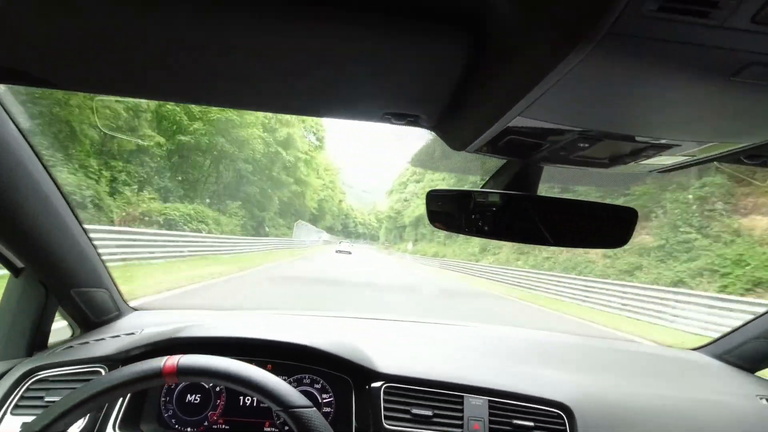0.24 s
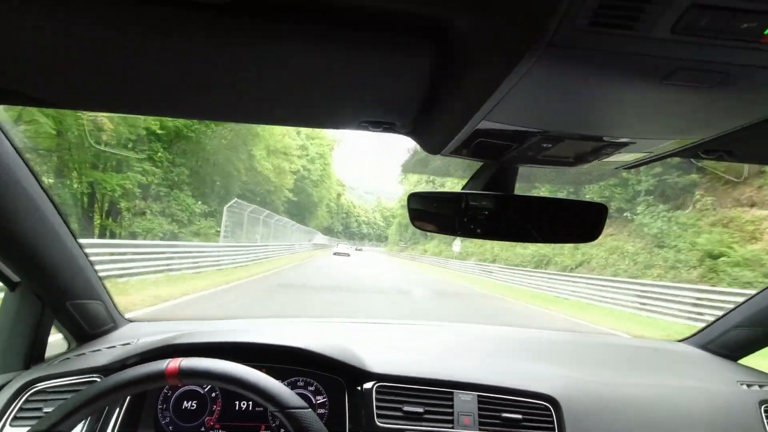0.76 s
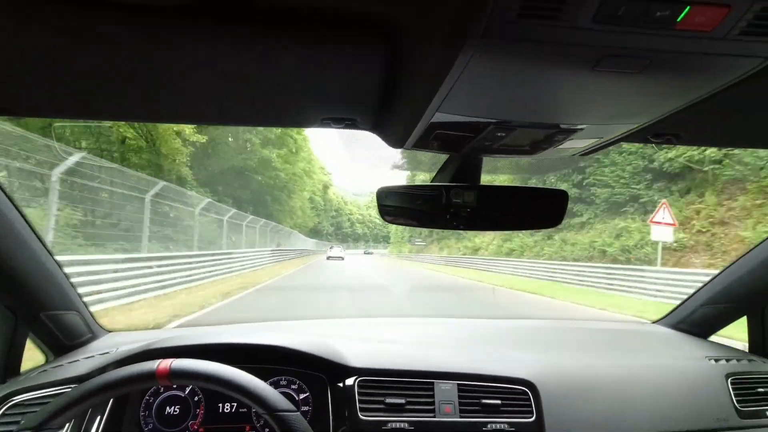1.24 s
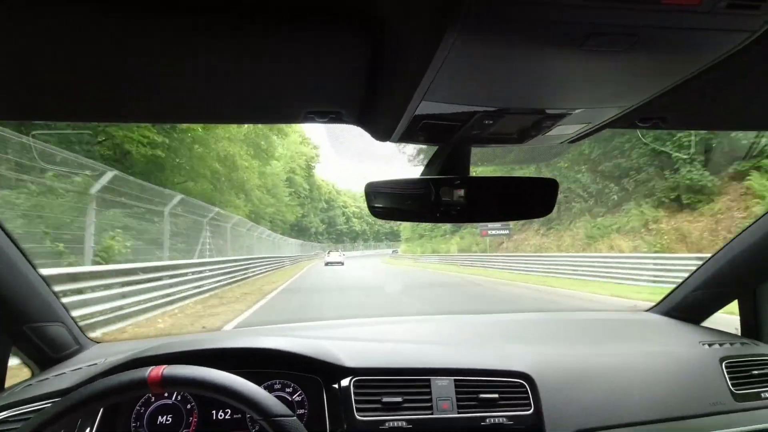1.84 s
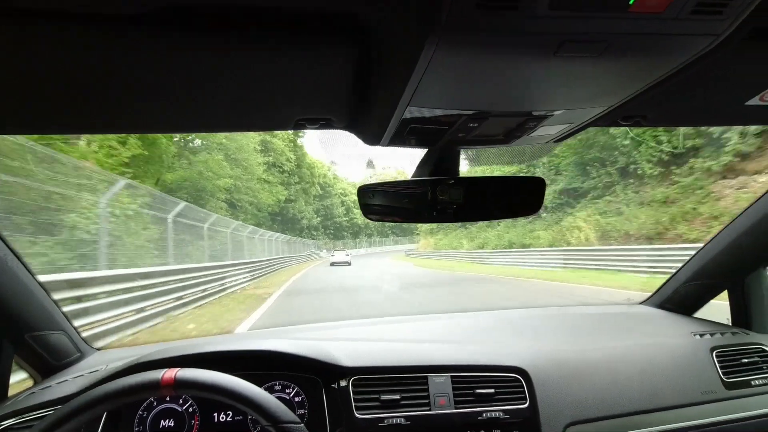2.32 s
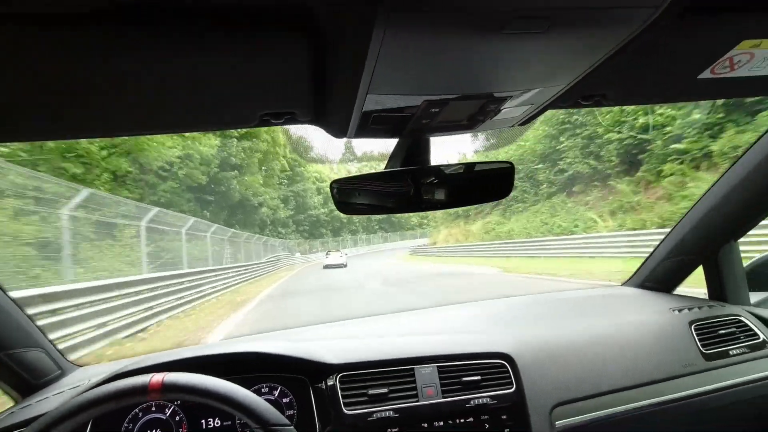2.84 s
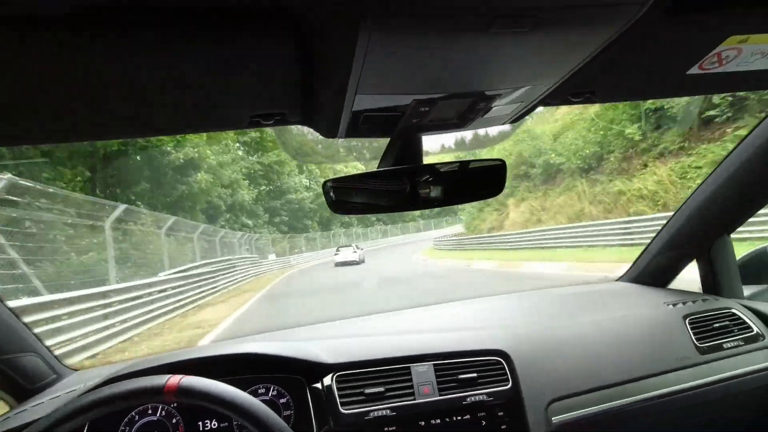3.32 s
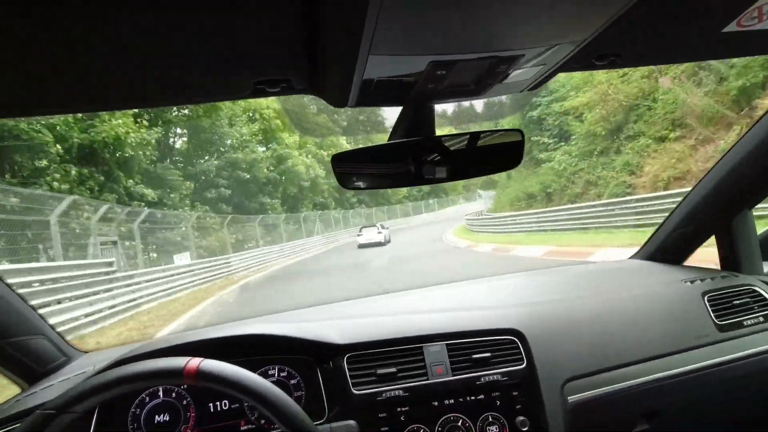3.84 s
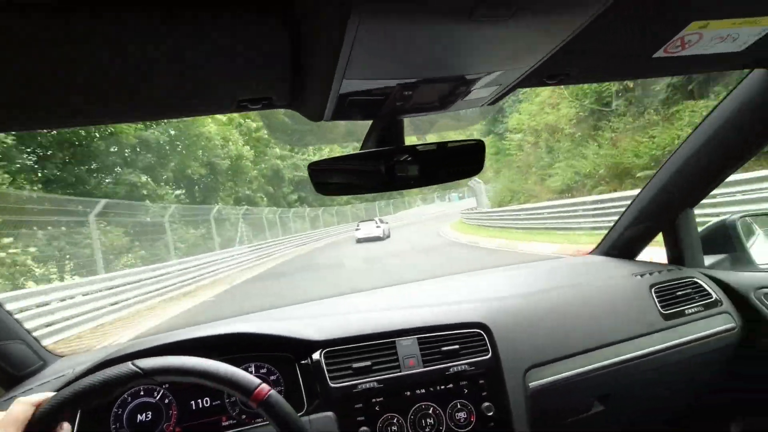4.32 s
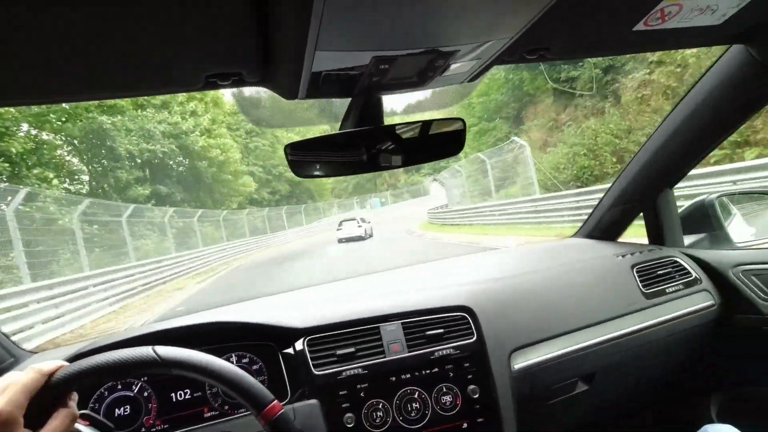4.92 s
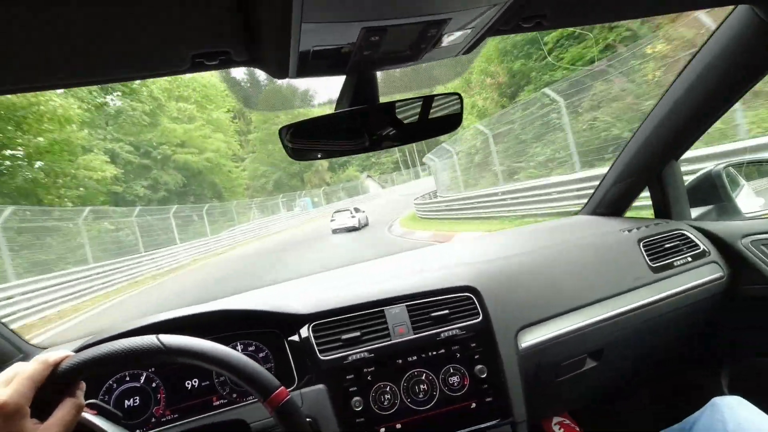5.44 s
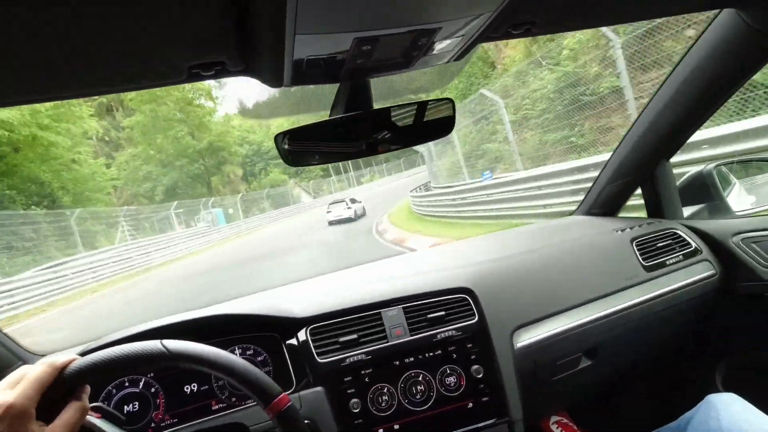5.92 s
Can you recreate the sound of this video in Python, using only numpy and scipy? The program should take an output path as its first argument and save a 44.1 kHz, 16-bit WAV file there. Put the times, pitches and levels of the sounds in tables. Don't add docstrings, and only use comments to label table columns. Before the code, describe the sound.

A stereo microphone in a car cabin picks up heavy low rumble and boom, road roar and soft wind hiss over a muffled engine. Speed drops steadily; the engine note sinks, then jumps up at each of two downshifts, with a bright plastic knock between them. Tyres then begin a rough mid-pitched howl with wavering squeals, a kerb hit makes loose parts clatter toward the right, and the engine pulls gently again.

```python
import sys
import numpy as np
from scipy import signal
from scipy.fft import rfft, irfft, next_fast_len
from scipy.io import wavfile
from scipy.ndimage import uniform_filter1d, map_coordinates

SR = 44100
rng = np.random.default_rng(int(sys.argv[2]) if len(sys.argv) > 2 else 0)


def boost_factor(decibels):
    exponent = np.asarray(decibels, float) / 20
    return 10 ** exponent


def digitize_waveform(pressure):
    field = np.atleast_2d(pressure).T
    bounded = np.clip(field, -1, 1)
    quanta = np.round(bounded * 32767).astype(np.int16)
    wavfile.write(sys.argv[1], SR, quanta)


N = 272097

# time in seconds, wheel turns per second, throttle from 0 to 1, road coarseness in dB.
DRIVE = [(0, 26.4, 1, 2.5), (.3, 26.7, 1, -0.5), (.45, 27.2, 0.8, 2.5), (.56, 26.8, 0.3, -0.5),
         (.98, 25.51, 0.05, 1.5), (1.2, 25.2, 0, -1), (1.55, 23.6, 0.32, 0), (1.9, 21.63, 0.2, 0.5),
         (2.22, 20.2, 0, 2), (2.4, 19.3, 0.04, -1), (2.9, 17.8, 0.17, 0), (3.55, 16.2, 0, 0.5),
         (3.95, 14.93, 0.04, 0.5), (4.4, 14.3, 0.01, -2), (4.9, 13.9, 0.15, 2), (5.35, 13.52, 0.32, 2.5),
         (5.78, 13.9, 0.32, -0.5), (6.0, 13.6, .42, 0.5)]
# time in seconds, crank turns per wheel turn.
GEARS = [
    (2.22, 3.42),
    (2.4, 4.7),
    (3.3, 4.7),
    (3.55, 6.23),
]
CRUISE_HZ = 20

# frequency in Hz, level in dB per Hz.
HEAVE_COLOUR = [(8.8, -29), (15, -2.5), (32, 2), (59, -6), (75, -9), (98, -25), (160, -120)]
RUMBLE_COLOUR = [(35, -41), (60, -9), (91, -3.5), (145, -1.5), (178, -6.5), (202, -6), (225, -11),
                 (252, -9.5), (278, -18), (344, -15.5), (450, -18), (580, -49), (990, -120)]
ROAR_COLOUR = [(180, -32.5), (300, -6), (349, -3.5), (392, -7.5), (487, -7.5), (565, -13), (714, -16.5),
               (830, -10), (887, -12.5), (1120, -14), (1220, -18.5), (1500, -19.5), (2200, -37),
               (2860, -66), (4840, -120)]
RUSH_COLOUR = [(1100, -40), (1800, -0.5), (2500, -3), (3100, -8), (3700, -11), (4350, -17.5), (5100, -20.5),
               (5900, -27), (6700, -33.5), (8900, -30), (10200, -35.5), (11700, -40), (12800, -39),
               (13000, -51.5), (16000, -59.5)]
# level in dB, dB per doubling of speed, dB at full throttle,
# share of the road coarseness, share of a jolt.
HEAVE_LAW = (-38.5, 2, -1.5, .5, 1)
RUMBLE_LAW = (-35.5, 3.5, -1, 0.93, 0.11)
ROAR_LAW = (-46, 2.5, 3.5, 0.47, 0.04)
RUSH_LAW = (-64.5, 4.5, 2.5, .5, 0.1027)
BOOM_LAW = (-42, 2, -0.5, -0.5, 0)
# start in seconds, length in seconds, body heave in dB, cabin boom in dB, boom pitch in Hz.
BUMPS = [(-.1, .17, -27, -31.5, 120.8), (0.098, .16, -29.5, -27, 101.2), (0.359, 0.07, -29.5, -29.5, 98.4),
         (0.628, 0.044, -33.5, -37.5, 102.2), (0.74, 0.044, -31, -32, 104.7),
         (.875, .08, -28.5, -18, 102.5), (.955, 0.064, -24.5, -18.5, 101.4), (1.36, 0.14, -44.5, -38, 90.9),
         (1.753, .08, -41.5, -38, 101), (1.921, .22, -40, -37.5, 117), (2.408, 0.091, -31.5, -36, 89.2),
         (2.501, .16, -30, -29.5, 97.9), (2.7, .08, -30.5, -42, 111.3), (2.87, .06, -36, -38.5, 109.3),
         (3.068, 0.044, -39.5, -38, 107.4), (3.27, .18, -37, -39, 88.3), (3.508, 0.064, -38.5, -43, 91.8),
         (3.621, .2, -39, -40, 98.6), (3.855, 0.078, -38.5, -39, 93.5), (5.119, 0.17, -35.5, -41, 100.4),
         (5.444, .03, -41.5, -51, 100), (5.705, 0.091, -40, -42.5, 101.2), (6.002, 0.091, -45, -42, 87)]
BUMP_RISE_S, BUMP_T60_S = .018, .2
BOOM_HZ, BOOM_DRIFT_HZ = 100, 6
# start in seconds, pitch in Hz, level in dB, time to fade 60 dB in seconds.
THUDS = [
    (.886, 81, -12.5, .12),
    (.36, 64, -19.5, .15),
    (5.45, 33, -19, 0.22),
    (5.439, 168, -24, 0.36),
    (5.439, 184, -24, 0.36),
    (5.449, 350, -25.5, 0.17),
    (5.449, 370, -26, .17),
    (-.024, 27, -18, .2),
    (5.445, 700, -37, 0.14),
    (5.44, 970, -42, .1),
]

# start in seconds, dull chatter in dB, bright tick in dB, shake length in seconds.
RATTLES = [(.04, -77, -91, .05), (0.466, -77, -74, 0.023), (0.548, -86, -86.5, .02),
           (0.869, -77.5, -84, .02), (1.004, -71.5, -86.5, .02), (1.5, -77, -87.5, 0.023),
           (2.422, -70, -76, .025), (2.732, -81, -84.5, .02), (2.791, -82, -79, .01),
           (2.824, -69, -77.5, 0.027), (2.927, -56.5, -75.5, .02), (3.01, -77.5, -86, .02),
           (3.258, -69, -89, .02), (3.332, -67.5, -85, 0.027), (3.636, -61.5, -82, 0.025),
           (3.986, -77, -84, 0.022), (4.267, -83, -83, .03), (4.568, -84.5, -86, .02),
           (4.776, -85, -80, .02), (4.848, -64.5, -81.5, .022), (4.886, -73, -81, 0.022),
           (5, -71, -79.5, 0.027), (5.115, -78, -82, 0.012), (5.132, -63, -81, 0.02),
           (5.222, -84, -90, .02), (5.349, -81.5, -79, .05), (5.431, -52, -63.5, 0.024),
           (5.867, -81, -87, .03)]
# frequency in Hz, level in dB per Hz.
DULL_COLOUR = [(500, -120), (1200, -2), (3000, 3.5), (4500, -2.5), (6000, -10.5), (7500, -21), (9000, -120)]
BRIGHT_COLOUR = [(5000, -120), (6500, -10), (8600, -6), (9500, -0.5), (10700, -3.5), (12400, -13),
                 (13400, -25), (14700, -10.5), (15600, -20), (16500, -120)]
FADE_S, FADE_S_PER_DB, SOFT_DB = .11, .0035, -78
BRIGHT_FADES = 1.5

# pitch in Hz, width in Hz, level in dB.
CLIP_MODES = [(2220, 40, -10), (3000, 30, -7), (3460, 60, -1), (3540, 35, -2), (3810, 30, 0),
              (3990, 25, -2), (4670, 45, -8), (5190, 28, -8), (5450, 30, -9), (5930, 60, -17),
              (6320, 60, -17), (7400, 150, -23), (8880, 150, -28)]
BUCKLE_MODES = [(1510, 150, 2), (1750, 90, 2), (2000, 60, -2), (2220, 45, -7), (2590, 40, -4),
                (2740, 35, -6), (3190, 40, -7), (4310, 80, -11), (5080, 45, -8), (9490, 120, -21),
                (10500, 110, -18), (11400, 100, -25), (12500, 45, -25), (14500, 200, -27)]
TRIM_MODES = [(5200, 200, -8), (9210, 120, 0), (10400, 60, -7), (11400, 120, -9), (12700, 60, -11),
              (14700, 150, -15)]
# time in seconds, level in dB.
CLIP_HITS = [
    (2.931, -47.5),
    (2.943, -47.5),
    (2.957, -50),
    (2.979, -56),
    (3.637, -72),
    (4.896, -71.5),
]
BUCKLE_HITS = [(4.852, -71), (4.9, -56), (5.015, -66), (5.136, -63), (5.428, -53.5), (5.4347, -43.5),
               (5.439, -43.5), (5.452, -46.5), (5.458, -47.5), (5.476, -47), (5.49, -55), (5.508, -58.5)]
TRIM_HITS = [(.47, -68.5), (1.0023, -79), (1.898, -78), (2.4216, -74.5), (2.4355, -69), (2.7967, -72.5),
             (2.8296, -71), (3.3395, -76), (3.6368, -69), (4.2639, -76), (4.7712, -76), (4.7792, -77),
             (4.8475, -73.5), (4.882, -71), (4.9907, -76), (5.0162, -71), (5.1159, -71), (5.1399, -68),
             (5.3509, -70), (5.4395, -58)]
CRACK_DB, CRACK_T60_S = -5, .012
DULLING = .4

# start in seconds, end in seconds,
# first pitch in Hz, last pitch in Hz, level in dB.
DRONES = [(-.05, .3, 351, 349, -41), (.36, .68, 357, 348, -40), (-.1, .45, 1806, 1803, -62),
          (.44, .62, 380, 376, -45), (0, .49, 1015, 1018, -56), (2.36, 2.65, 468, 458, -54),
          (2.08, 2.33, 202, 198, -42), (1.04, 1.36, 139, 142, -36.5), (3, 3.35, 137, 134, -39.5),
          (3.64, 3.95, 340, 345, -46), (3.22, 3.45, 203, 200, -44), (5.65, 5.85, 918, 927, -48.5),
          (5.67, 5.82, 880, 892, -52), (3.14, 3.32, 250, 246, -46), (4.62, 4.95, 186, 182, -44),
          (3.46, 3.62, 80, 110, -33), (3.54, 3.69, 128, 152, -38), (3.61, 3.74, 68, 86, -38),
          (4.05, 4.27, 152, 158, -43), (3.83, 3.99, 176, 165, -41), (1.62, 1.85, 158, 148, -40),
          (1.98, 2.14, 168, 163, -41), (4.7, 4.93, 192, 208, -45), (5.72, 6.3, 330, 345, -48.5),
          (5.82, 6.3, 594, 604, -57), (5.15, 5.34, 104, 112, -37), (4.18, 4.4, 320, 340, -50),
          (2.93, 3.1, 232, 240, -45)]
SQUEALS = [(.5, 2.1, 828, 828, -59), (-.1, .2, 1150, 1150, -53), (4.58, 4.92, 805, 842, -55),
           (5.02, 5.4, 812, 836, -51), (5.2, 5.32, 875, 880, -57), (5.05, 5.33, 760, 755, -59),
           (5.42, 5.72, 690, 700, -62), (5.36, 5.7, 865, 890, -55), (4.82, 4.95, 875, 890, -55),
           (5.6, 6.3, 660, 690, -61), (5.88, 6.4, 1015, 1075, -57), (.2, .48, 1230, 1230, -58),
           (5.42, 5.68, 960, 935, -57), (5.72, 5.9, 1035, 1050, -57), (5.84, 6.0, 1090, 1090, -58),
           (4.9, 5.06, 920, 940, -58)]
DRONE_BLUR_HZ, SQUEAL_BLUR_HZ = 1.5, 7
# time in seconds, level in dB.
HOWL_LEVEL = [(4.3, -75.5), (4.6, -57), (4.9, -52.5), (5.2, -54), (5.5, -49.5), (5.8, -50.5), (6.17, -51)]
# frequency in Hz, level in dB per Hz.
SLIP_COLOUR = [(600, -59.5), (720, -8.5), (830, 1), (950, 1.5), (1100, -5.5), (1300, -21.5), (1600, -61.5)]

# multiple of the crank speed, level off the throttle in dB, dB gained at full throttle.
ENGINE_ORDERS = [(4 / 2, -51.5, 6.4), (5 / 2, -70, 24), (6 / 2, -62, 9.3), (7 / 2, -65.5, 25),
                 (8 / 2, -70, 23), (10 / 2, -67.5, 5), (12 / 2, -61.5, -16), (14 / 2, -72.5, 19.8)]
# pitch in Hz, width in Hz, lift in dB.
PANELS = [
    (146.2, 12, 18),
    (346, 25, 9.5),
    (496.6, 36, 12.5),
]

# frequency in Hz, likeness up to 1.
CABIN_ALIKE = [(100, .9995), (220, 1), (400, 0.96), (650, .96), (1000, 0.88), (1450, 0.57), (1950, 0.55),
               (2500, 0.26), (3100, 0.032), (4350, 0.2), (5900, 0.38), (9000, 0.13), (11700, 0.4),
               (14000, .2)]
PART_ALIKE = [(1200, 0.95), (2200, 0.35), (9000, 0.48)]
# frequency in Hz, lag in radians.
CABIN_LAG = [(200, .01), (400, .05), (1000, 0.18), (1950, 0.65), (2500, 0.75), (3700, 3.5), (5100, 4.8),
             (6500, 6.3), (9000, 8.8), (12500, 11)]
PART_LAG_S = 0.00014


def unit(x):
    return x / np.sqrt(np.mean(x ** 2) + 1e-20)


def along(points, hz):
    f, v = np.transpose(points)
    return np.interp(np.log(hz + 1), np.log(f + 1), v)


def curves(rows):
    s, *columns = np.transpose(rows)
    return [np.interp(np.arange(N) / SR, s, column) for column in columns]


def wobble(rate, count=N):
    knots = rng.standard_normal(int(count * rate / SR) + 4)
    return map_coordinates(knots, [np.arange(count) * rate / SR])


def add(out, s, piece):
    first = round(s * SR)
    part = out[..., max(first, 0):max(first + piece.shape[-1], 0)]
    part += piece[..., max(-first, 0):][..., :part.shape[-1]]


def filtered(x, response):
    x = np.pad(x, [(0, 0)] * (x.ndim - 1) + [(4096, 4096)], mode="reflect")
    m = next_fast_len(x.shape[-1])
    spectrum = rfft(x, m) * response(np.fft.rfftfreq(m, 1 / SR))
    return irfft(spectrum, m)[..., 4096:4096 + N]


def tone(hz, blur_hz, blur_rate):
    wandering_hz = hz + blur_hz * wobble(blur_rate, count=len(hz))
    phase = 2 * np.pi * (np.cumsum(wandering_hz) / SR + rng.random())
    return np.sqrt(2) * np.array([np.sin(phase), np.cos(phase)])


def coloured_noise(colour, patchy_db):
    z = signal.stft(rng.standard_normal((2, N)), nperseg=1024)[2]
    field = uniform_filter1d(rng.standard_normal(z.shape[1:]), size=5, axis=0)
    field = uniform_filter1d(field, size=8, axis=1)
    pair = signal.istft(z * boost_factor(patchy_db * unit(field)), nperseg=1024)[1][:, :N]
    return unit(filtered(pair, lambda hz: boost_factor(along(colour, hz))))


def bump_shape(length):
    t = np.arange(SR // 2) / SR
    rise = np.clip(t / BUMP_RISE_S, 0, 1) ** 2
    return rise * boost_factor(-60 * np.clip(t - length, 0, 1) / BUMP_T60_S)


def road_gain(law):
    db, speed_db, load_db, coarse, jolted = law
    wheel_hz, throttle, surface_db = curves(DRIVE)
    jolts = np.ones(N)
    for s, length, heave_db, *_ in BUMPS:
        add(jolts, s, boost_factor(2 * (heave_db - HEAVE_LAW[0])) * bump_shape(length) ** 2)
    drive_db = db + speed_db * np.log2(wheel_hz / CRUISE_HZ) + load_db * throttle + coarse * surface_db
    return boost_factor(drive_db) * jolts ** (jolted / 2)


def road():
    surface = wobble(9)
    heave = coloured_noise(HEAVE_COLOUR, patchy_db=3.5)
    power = uniform_filter1d(heave ** 2, size=3000, axis=1)
    heave = unit(heave / (0.16 + np.sqrt(np.abs(power))))
    rumble = boost_factor(0.27 * surface) * coloured_noise(RUMBLE_COLOUR, patchy_db=1.04)
    roar = boost_factor(0.14 * surface) * coloured_noise(ROAR_COLOUR, patchy_db=1.0)
    wind = boost_factor(.4 * surface + 0.41 * wobble(6.6)) * coloured_noise(RUSH_COLOUR, patchy_db=2.0)
    return (road_gain(HEAVE_LAW) * heave + road_gain(RUMBLE_LAW) * rumble
            + road_gain(ROAR_LAW) * roar + road_gain(RUSH_LAW) * wind)


def boom():
    mutter = tone(BOOM_HZ + BOOM_DRIFT_HZ * wobble(7), blur_hz=3.98, blur_rate=30)
    out = road_gain(BOOM_LAW) * boost_factor(1.4 * wobble(9)) * mutter
    for s, length, _, db, hz in BUMPS:
        shape = bump_shape(length)
        add(out, s, boost_factor(db) * shape * tone(np.full(len(shape), hz), blur_hz=1.8, blur_rate=33))
    return out * boost_factor(0.97 * wobble(25))


def floor_thuds():
    out, t = np.zeros((2, N)), np.arange(SR // 2) / SR
    for s, hz, db, t60 in THUDS:
        soft_start = 1 - np.exp(-t / 0.0078)
        add(out, s, boost_factor(db - 60 * t / t60) * np.sin(2 * np.pi * hz * t) * soft_start)
    return out


def rattles():
    shakes, t = np.zeros((2, N)), np.arange(SR // 2) / SR
    for s, dull_db, bright_db, shake in RATTLES:
        t60 = max(FADE_S + FADE_S_PER_DB * (dull_db - SOFT_DB), .02)
        jolt = np.clip(t / 0.0045, 0, 1) * boost_factor(-60 * np.clip(t - shake, 0, 1) / t60)
        add(shakes, s, boost_factor([[dull_db], [bright_db]]) * jolt ** [[1], [BRIGHT_FADES]])
    dull, bright = shakes * boost_factor(1.5 * wobble(250))
    chatter = dull * coloured_noise(DULL_COLOUR, patchy_db=1.5)
    return chatter + bright * coloured_noise(BRIGHT_COLOUR, patchy_db=2.5)


def ringing(modes, hits):
    out, t = np.zeros((2, N)), np.arange(SR // 8) / SR
    hz, width, mode_db = np.transpose(modes)[:, :, None]
    hardest = max(db for _, db in hits)
    for s, db in hits:
        dull_db = DULLING * min(hardest - db, 8) * np.clip(np.log2(hz / 4000), 0, 2)
        strength = boost_factor(db + mode_db - dull_db + rng.normal(0, 1.5, (2, *hz.shape)))
        swing = np.sin(2 * np.pi * (hz * t + rng.random((2, *hz.shape))))
        ring = (strength * np.exp(-np.pi * width * t) * swing).sum(axis=1)
        noise = uniform_filter1d(rng.standard_normal((2, len(t))), size=5, axis=1)
        crack = boost_factor(db + CRACK_DB - 60 * t / CRACK_T60_S) * noise
        add(out, s, ring * (1 - np.exp(-t / .0015)) + crack * (1 - np.exp(-t / .0004)))
    return out


def loose_parts():
    return ringing(CLIP_MODES, CLIP_HITS) + ringing(BUCKLE_MODES, BUCKLE_HITS) + ringing(TRIM_MODES, TRIM_HITS)


def passing_tones(rows, blur_hz):
    out = np.zeros((2, N))
    for start, end, first_hz, last_hz, db in rows:
        t = np.arange(round((end - start) * SR)) / SR
        gate = np.clip(np.minimum(t, end - start - t) / .04, 0, 1)
        swell = boost_factor(db + (0.94 + 0.12 * blur_hz) * wobble(14, count=len(t)))
        glide_hz = np.interp(t, [0, end - start], [first_hz, last_hz])
        add(out, start, gate * swell * tone(glide_hz, blur_hz, blur_rate=40))
    return out


def tyre_howl():
    return boost_factor(curves(HOWL_LEVEL)[0]) * coloured_noise(SLIP_COLOUR, patchy_db=2.5)


def engine():
    wheel_hz, throttle, _ = curves(DRIVE)
    crank_hz = wheel_hz * curves(GEARS)[0]
    out = np.zeros((2, N))
    for multiple, db, load_db in ENGINE_ORDERS:
        order_hz = multiple * crank_hz
        lift = 1
        for hz, width, top_db in PANELS:
            lift = lift + boost_factor(top_db) / (1 + (2 * (order_hz - hz) / width) ** 2) ** 2
        loudness = boost_factor(db + load_db * throttle + 1.1 * wobble(11))
        out += lift * loudness * tone(order_hz, blur_hz=0.5, blur_rate=15)
    return out


def two_ports(pair, alike, lag):
    def turn(hz):
        return np.arccos(np.clip(along(alike, hz), -1, 1)) / 2

    mid, side = filtered(pair, lambda hz: np.array([np.cos(turn(hz)), np.sin(turn(hz))]))
    left_right = np.array([mid + side, mid - side])
    return filtered(left_right, lambda hz: np.exp(-.5j * lag(hz) * [[1], [-1]]))


def scene():
    cabin = road() + boom() + floor_thuds() + rattles()
    cabin += passing_tones(DRONES, DRONE_BLUR_HZ) + passing_tones(SQUEALS, SQUEAL_BLUR_HZ)
    cabin += tyre_howl() + engine()
    return (two_ports(cabin, CABIN_ALIKE, lambda hz: along(CABIN_LAG, hz))
            + two_ports(loose_parts(), PART_ALIKE, lambda hz: 2 * np.pi * hz * PART_LAG_S))


def roll_off(x):
    return signal.sosfilt(signal.butter(12, 15800, fs=SR, output="sos"), x)


def record(dry):
    return roll_off(dry)


dry = scene()
out = record(dry)
digitize_waveform(out)
```